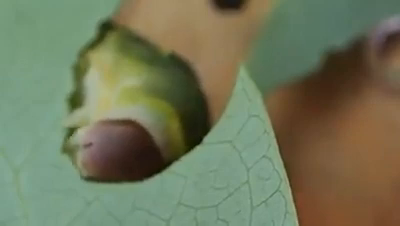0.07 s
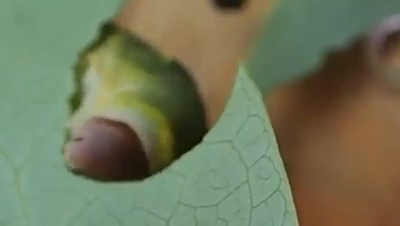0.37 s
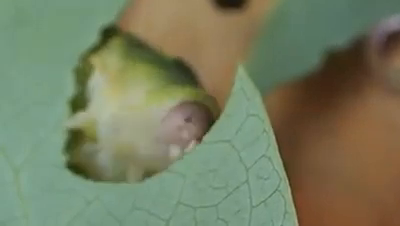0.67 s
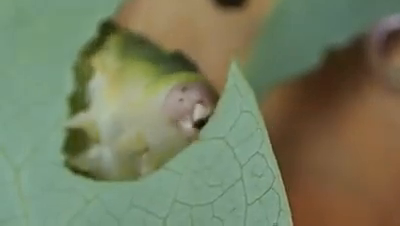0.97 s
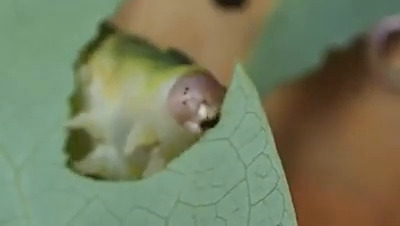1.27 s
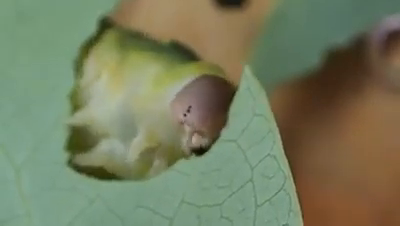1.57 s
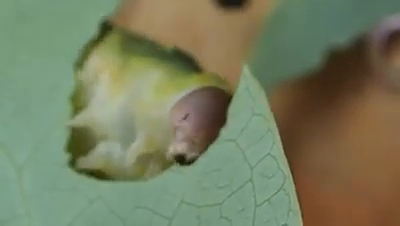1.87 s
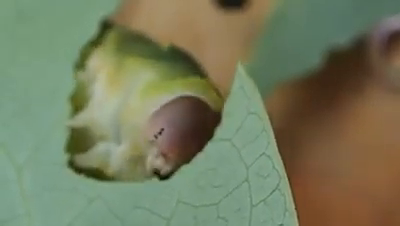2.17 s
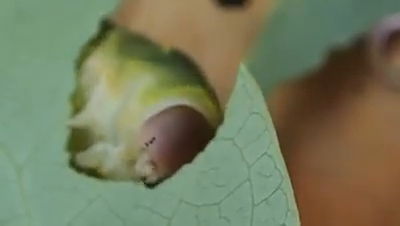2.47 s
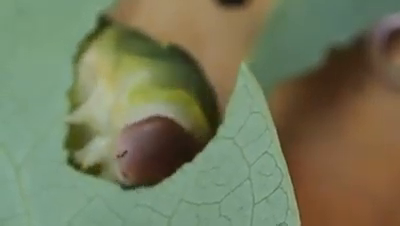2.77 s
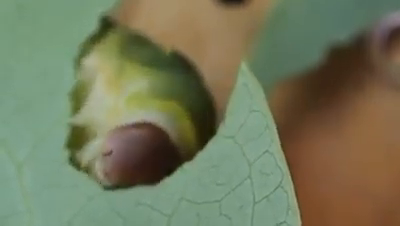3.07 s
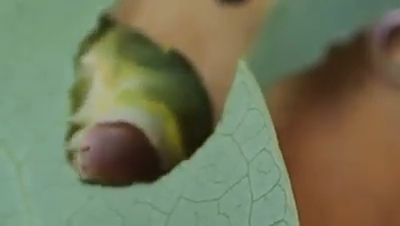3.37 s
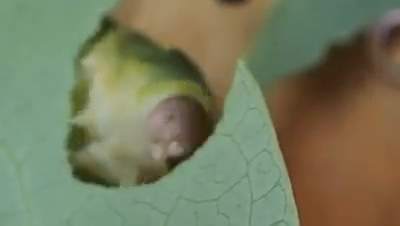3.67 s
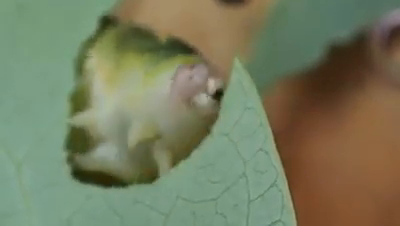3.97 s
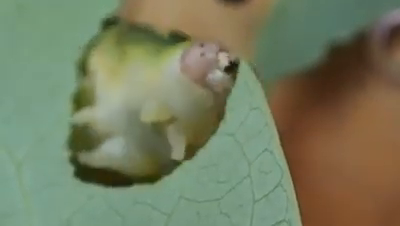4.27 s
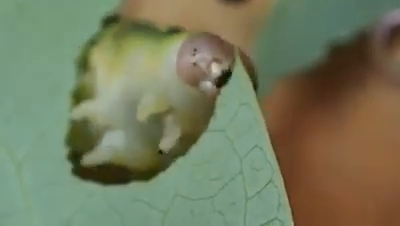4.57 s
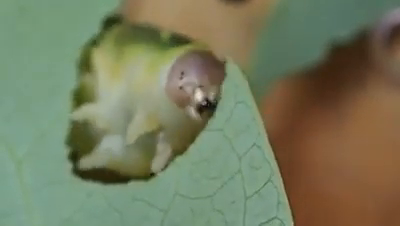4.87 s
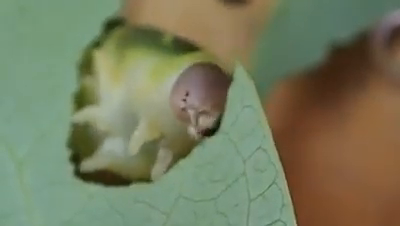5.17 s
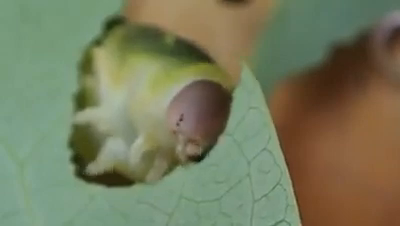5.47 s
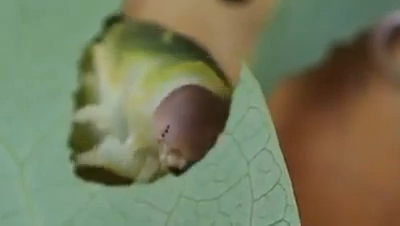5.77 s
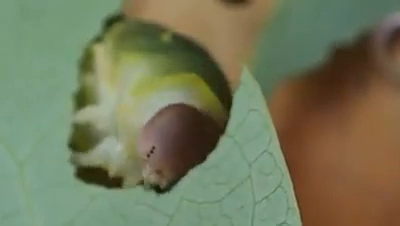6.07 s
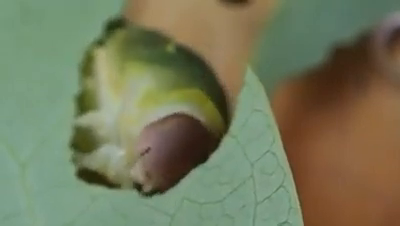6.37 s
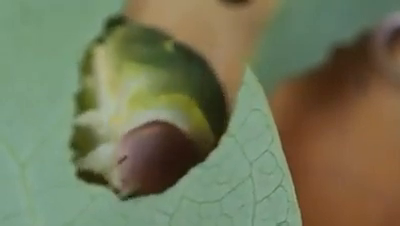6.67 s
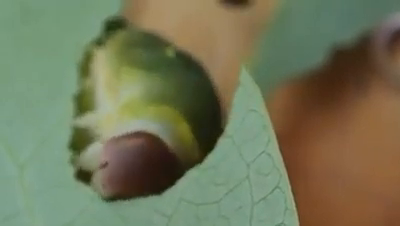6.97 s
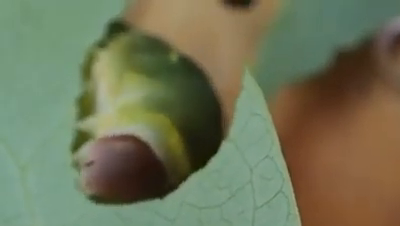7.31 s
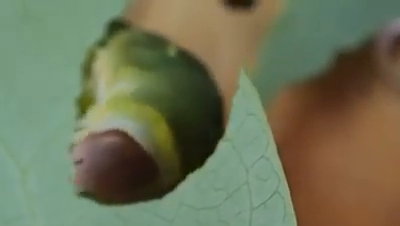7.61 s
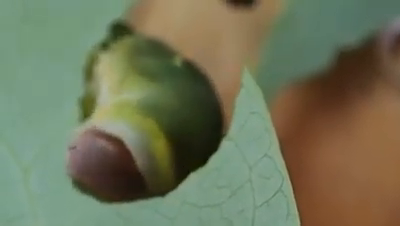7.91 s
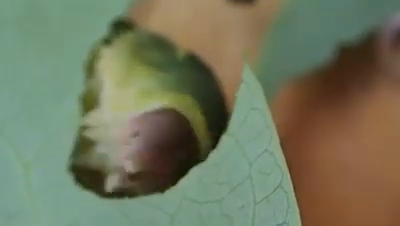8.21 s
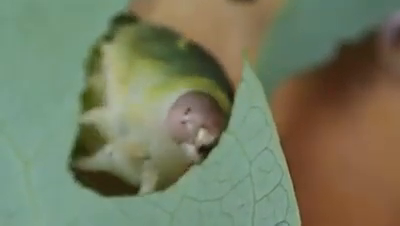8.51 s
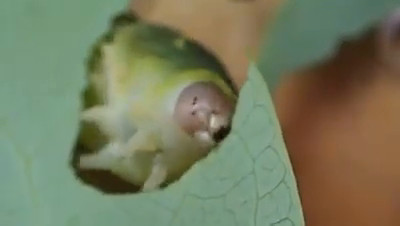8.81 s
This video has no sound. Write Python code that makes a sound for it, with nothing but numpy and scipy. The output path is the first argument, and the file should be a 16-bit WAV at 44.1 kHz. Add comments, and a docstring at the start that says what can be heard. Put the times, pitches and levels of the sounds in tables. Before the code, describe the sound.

A caterpillar chews a leaf close by in bouts of quick, crisp crunching ticks, over a soft hiss and low hum.

```python
"""Caterpillar chewing a leaf

Close by, the head sweeps along the edge from tip to foot at six bites a second. Each bite fractures
a run of tiny cells and now and then snaps a vein; both impulses excite the stiff leaf's damped modes.
Sometimes the jaws skid and squeak by stick-slip friction. Behind this lie a soft hiss, the low drone
of the room, the hum of distant machines and one dull knock."""
import sys
import numpy as np
from scipy import signal
from scipy.fft import rfft, irfft, next_fast_len
from scipy.io import wavfile
from scipy.ndimage import map_coordinates

SR = 44100
rng = np.random.default_rng(int(sys.argv[2]) if len(sys.argv) > 2 else 0)


def master(y):
    """Save y as 16-bit WAV."""
    cut = np.clip(np.atleast_2d(y).T, -1, 1)
    pcm = np.round(cut * 32767)  # scale
    wavfile.write(sys.argv[1], SR, pcm.astype(np.int16))


N = 399105


def amp(db):
    """Amplitude ratio of a level in decibels."""
    return 10 ** (np.asarray(db) / 20)


def unit(x):
    """Normalisation to an rms of 1."""
    return x / np.sqrt(np.mean(x ** 2) + 1e-20)


def wobble(n, rate):
    """Smooth random modulation: n samples of a spline with `rate` knots a second."""
    return map_coordinates(rng.standard_normal(int(n * rate / SR) + 4), [np.arange(n) * rate / SR])


def filtered(x, response):
    """Linear filtering: the spectrum of x times a complex frequency response."""
    n = x.shape[-1]
    padded = next_fast_len(n + 8192)
    return irfft(rfft(x, padded) * response(np.fft.rfftfreq(padded, 1 / SR)), padded)[..., :n]


def coloured(x, points):
    """Spectral shaping by (f/Hz, level/dB) points on a logarithmic frequency axis."""
    f, db = np.transpose(points)
    return filtered(x, lambda hz: amp(np.interp(np.log(hz + 1), np.log(f), db)))


def resonance(f, centre, width):
    """Causal frequency response of a damped harmonic oscillator."""
    return 1j * f * width / (centre ** 2 - f ** 2 + 1j * f * width)


def band(x, hz, width, order=2):
    """Band-pass filtering by equal resonators in cascade; rms 1."""
    return unit(filtered(x, lambda f: resonance(f, hz, width) ** order))


def fractures(n, rate, spread_db):
    """Shot noise: cells burst at random, `rate` a second, with uneven sizes; rms 1."""
    hit = rng.random(n) < rate / SR
    polarity = rng.choice([-1, 1], n)
    size = amp(spread_db * np.clip(rng.standard_normal(n), -2, 2))
    return unit(hit * polarity * size)


# Spectrum of the room's low sound: f/Hz, relative level/dB
ROOM_SPECTRUM = [(15, -16), (30, -8), (45, -11), (62, 1.5), (80, 1), (100, -2.5), (135, 1.5), (170, -3),
                 (215, 3), (320, -8.5), (400, 0.5), (500, -7), (800, -11.5), (1500, -17), (2200, -24.5),
                 (4000, -33.5)]
# Noise bands of distant machines: f/Hz, bandwidth/Hz, relative level/dB
MACHINE_BANDS = [(207, 7, -53), (237.5, 3.5, -49.6), (247.5, 5.5, -49.4), (289.5, 7.4, -59),
                 (353.5, 1.6, -60.5), (392.8, 12, -64.5), (415, 4, -65), (449.3, 16, -62), (531, 2.4, -62)]
# Spectrum of the hiss: f/Hz, relative level/dB
HISS_SPECTRUM = [(20, -15), (60, -11.5), (150, 6.5), (240, -1.5), (500, 7), (1300, 8.5), (2100, 3.5),
                 (2700, 2), (3600, -18), (4300, -1), (5000, 4), (5600, 7.5), (6400, -21.5), (7400, 1),
                 (8600, -11)]

def background(room_db=-44.3, hiss_db=-53.2, rumble_db=-53.5, fall_db_per_s=.3748):
    """Coherent and diffuse noise: room, machines and rumble are alike in both channels; hiss is not."""
    t = np.arange(N) / SR
    room = amp(room_db) * unit(coloured(rng.standard_normal(N), ROOM_SPECTRUM))
    machines = sum(amp(db) * band(rng.standard_normal(N), hz, 2 * width, order=3)
                   for hz, width, db in MACHINE_BANDS)
    hiss = amp(hiss_db) * unit(coloured(rng.standard_normal((2, N)), HISS_SPECTRUM))
    rumble = amp(rumble_db) * band(rng.standard_normal(N), hz=90, width=120)
    passing = np.exp(-.5 * ((t - 3.3) / 1.4) ** 2)  # the rumble peaks at 3.3 s
    fading = amp(.82 - fall_db_per_s * t)
    return fading * (room + machines) + passing * rumble + hiss


# Spectrum of the room's lateral sound: f/Hz, relative level/dB
LATERAL_SPECTRUM = [(20, -26), (40, -9), (60, 0), (150, 2), (350, 1.5), (900, -7), (2500, -25)]

def lateral_room(db=-61):
    """Antiphase: room sound from the sides reaches left and right with opposite signs."""
    side = amp(db) * unit(coloured(rng.standard_normal(N), LATERAL_SPECTRUM))
    return np.array([side, -side])


# Passing low tones: peak t/s, standard deviation/s, f/Hz, range of wander/Hz, peak level/dB
DRONE_SWELLS = [(.2, .25, 207, 12, -50), (.98, .07, 243, 8, -45), (1.72, .1, 240, 8, -43),
                (1.8, .2, 210, 8, -49), (2.1, .2, 54, 8, -56), (3.5, .4, 64.5, 10, -53),
                (6.82, .07, 243, 8, -44.5), (8.4, .25, 74, 8, -55)]

def swelling():
    """Amplitude modulation: unsteady tones rise from the drone and sink under Gaussian envelopes."""
    t, out = np.arange(N) / SR, np.zeros(N)
    for peak, spread, hz, wander, db in DRONE_SWELLS:
        pitch = hz + wander / 4 * wobble(N, 8)
        envelope = amp(db) * np.exp(-.5 * ((t - peak) / spread) ** 2)
        out += np.sqrt(2) * envelope * np.sin(2 * np.pi * np.cumsum(pitch) / SR)
    return out


# Runs of a distant motor: t/s, duration/s, initial f/Hz, initial level/dB
MOTOR_RUNS = [(3.88, 1.206, 422, -46.6), (5.3, .17, 417, -50)]

def motor_whine(sag_hz_per_s=4, fade_db_per_s=2.4, waver_db=.6, ramp_s=.055):
    """Tonal machine noise: one spectral line sags in frequency as it wavers and fades."""
    out = np.zeros(N)
    for start, length, first_hz, db in MOTOR_RUNS:
        t = np.maximum(np.arange(N) / SR - start, 0)
        running = np.clip(np.minimum(t, length + ramp_s - t) / ramp_s, 0, 1)
        hz = first_hz - sag_hz_per_s * t
        level = amp(db - fade_db_per_s * t + waver_db * wobble(N, 9))
        out += np.sqrt(2) * running * level * np.sin(2 * np.pi * np.cumsum(hz) / SR)
    return out


def knock(at_s=7.769, hz=500, db=-25, t60=.028, attack_s=.002):
    """Free decay of one damped mode: a soft, dull knock."""
    t = np.maximum(np.arange(N) / SR - at_s, 0)
    envelope = amp(db - 60 * t / t60) * (1 - np.exp(-t / attack_s))
    return envelope * np.sin(2 * np.pi * hz * t)


# Spectrum of the leaf damped by feet and lips: f/Hz, relative level/dB
DAMPED_LEAF = [(1200, -36.5), (2100, -16), (2800, -5.5), (3700, -14), (4250, -12), (4550, 2), (5000, -3.5),
               (5700, -5), (6500, -10.5), (7000, -15), (8600, -15.5)]
# Course of the faint crackle: t/s, level/dB
FIDGET_LEVELS = [(0, -47.5), (.37, -60), (1.1, -60), (1.55, -51.5), (4.2, -53), (5.2, -51.5), (8, -52.5),
                 (8.2, -60.5), (9.05, -58)]

def fidgeting(restless_db=1.2):
    """Contact damping: faint scratches of jaws and feet sound in broad humps between the bites."""
    scratches = coloured(fractures(N, rate=2500, spread_db=2), DAMPED_LEAF)
    db = np.interp(np.arange(N) / SR, *np.transpose(FIDGET_LEVELS))
    return amp(db + restless_db * wobble(N, 22)) * unit(scratches)


# Light drags of jaws and feet: t/s, duration/s, initial f/Hz, final f/Hz, level/dB
DRAGS = [(7.28, .06, 5300, 5000, -51), (7.99, .12, 4100, 2950, -58), (8.11, .06, 5200, 5700, -57)]

def scraping(width_hz=700):
    """Sliding friction: grains sound through four crossfaded bands, heard as one gliding resonance."""
    out, n = np.zeros(N + SR), SR // 5
    for start, length, first_hz, last_hz, db in DRAGS:
        progress = np.clip(np.arange(n) / SR / length, 0, 1)
        envelope = amp(db) * np.sqrt(np.abs(np.sin(np.pi * progress)))
        grains = fractures(n, rate=1500, spread_db=3)
        for stage in np.linspace(0, 1, 4):
            hz = first_hz + stage * (last_hz - first_hz)
            share = np.maximum(1 - 3 * np.abs(progress - stage), 0)
            out[int(start * SR):][:n] += envelope * share * band(grains, hz, width_hz)
    return out[:N]


# Skids of the jaws on the cut edge: t/s, duration/s, initial f/Hz, final f/Hz, level/dB
SKIDS = [(2.808, .032, 4700, 5350, -42), (3.39, .028, 4950, 5600, -39), (3.422, .013, 4950, 4900, -39),
         (4.31, .038, 4950, 5650, -42), (4.34, .03, 4550, 4900, -42.5), (4.841, .01, 4850, 4830, -33),
         (4.855, .022, 5150, 4980, -37), (4.878, .032, 5200, 5600, -38), (6.83, .064, 5700, 5330, -35)]

def squeaking(wander=.014, slips_per_s=260, flutter_db=3.5, ramp_s=.004):
    """Stick-slip oscillation: a short, fluttering whistle glides as the jaws skid."""
    out = np.zeros(N + SR)
    for start, length, first_hz, last_hz, db in SKIDS:
        t = np.arange(int(length * SR)) / SR
        glide = np.interp(t, [0, length], [first_hz, last_hz])
        hz = glide * (1 + wander * wobble(SR // 5, slips_per_s)[:len(t)])
        flutter = amp(flutter_db * wobble(SR // 5, slips_per_s)[:len(t)])
        whistle = unit(flutter * np.sin(2 * np.pi * np.cumsum(hz) / SR))
        pressure = np.clip(np.minimum(t, length - t) / ramp_s, 0, 1)
        out[int(start * SR):][:len(t)] += amp(db) * pressure * whistle
    return out[:N]


# Bending modes of the blade: f/Hz, bandwidth/Hz, relative level/dB
BENDING_MODES = [(1900, 1000, -37.5), (2418, 84, -11.5), (2691, 83, -7.5), (2835, 83, -6.5),
                 (3180, 260, -11), (3316, 74, -9.5), (3580, 110, -8), (3950, 700, -11.5)]
# Modes of the stiff cut edge: f/Hz, bandwidth/Hz, relative level/dB
EDGE_MODES = [(4560, 130, 2.5), (4917, 143, 4), (5210, 88, -1), (5290, 110, 3), (5580, 370, 1.5),
              (5885, 90, 2), (6200, 160, -4), (6110, 96, -0.5), (6400, 84, -1), (6624, 140, -1),
              (6900, 400, -9), (7390, 300, -12), (7970, 300, -15), (8500, 190, -17)]

def leaf(force, flex_db, vary_db, retune=.04, size=2048):
    """Modal response: a force rings the leaf, and every grip retunes and reweights its modes."""
    hz, width, db = np.transpose(BENDING_MODES + EDGE_MODES)
    bends = np.arange(len(hz)) < len(BENDING_MODES)
    shift = retune * np.where(bends, 1, .5)  # the stiff edge moves half as much
    hz = hz * (1 + shift * rng.uniform(-1, 1, len(hz)))
    db = db + flex_db * bends + vary_db * rng.uniform(-1, 1, len(hz))
    f = np.fft.rfftfreq(size, 1 / SR)[:, None]
    gain = np.linalg.norm(amp(db) * np.abs(resonance(f, hz, width)) ** 2, axis=1)
    # minimum phase: the ring starts at once, then the modes beat and die
    cepstrum = irfft(np.log(gain + 1e-4))
    cepstrum[1:size // 2] *= 2
    cepstrum[size // 2 + 1:] = 0
    impulse_response = irfft(np.exp(rfft(cepstrum)))
    return signal.fftconvolve(force, impulse_response)[:len(force)]


# Breaking veins and fibres: t/s, level/dB (first 5 ms), T60/s, bending gain/dB, favoured f/Hz
VEIN_SNAPS = [(0.0413, -27.0, 0.015, 2, 5720.0), (0.3492, -32.5, 0.017, 6, 5790.0),
              (1.0922, -39.0, 0.014, 0, 4830.0), (1.1507, -34.5, 0.02, -1, 5250.0),
              (1.271, -37.5, 0.03, 1, 5170.0), (1.3274, -29.5, 0.02, 0, 5530.0),
              (1.353, -30.0, 0.02, 3, 5200.0), (1.4955, -34.5, 0.014, 5, 5560.0),
              (1.527, -24.5, 0.018, 6, 5470.0), (1.7347, -35.0, 0.018, 6, 5550.0),
              (2.0343, -33.0, 0.018, 3, 5510.0), (2.053, -36.5, 0.018, 12, 5290.0),
              (2.4971, -41.0, 0.014, 5, 5980.0), (2.8047, -37.0, 0.023, 5, 5110.0),
              (2.9855, -26.5, 0.017, 3, 5740.0), (3.0003, -24.5, 0.04, 0, 5500.0),
              (3.1339, -36.5, 0.014, 1, 5540.0), (4.392, -24.5, 0.016, -6, 5230.0),
              (4.401, -37.0, 0.025, 0, 5320.0), (4.5583, -30.5, 0.025, 3, 5510.0),
              (4.571, -33.0, 0.045, -8, 4830.0), (4.7211, -30.0, 0.04, -6, 5010.0),
              (4.7305, -26.0, 0.016, -5, 5080.0), (4.808, -40.5, 0.025, 2, 5310.0),
              (4.8434, -36.5, 0.02, -8, 4920.0), (4.8951, -36.5, 0.03, 1, 5560.0),
              (5.0708, -30.0, 0.04, 3, 5690.0), (5.075, -30.5, 0.025, 2, 5650),
              (5.082, -28.5, 0.012, 4, 5620.0), (5.5508, -34.0, 0.013, 6, 5650.0),
              (5.598, -34.5, 0.018, 7, 5660.0), (5.9186, -35.0, 0.012, 13, 5520.0),
              (6.0673, -37.0, 0.014, 3, 5570.0), (6.408, -38.5, 0.012, 6, 5680.0),
              (6.5723, -39.5, 0.013, 2, 5590.0), (6.832, -36.0, 0.016, 3, 5750.0),
              (6.852, -32.5, 0.02, 3, 5540.0), (6.881, -41.0, 0.012, 3, 5520.0),
              (6.9093, -36.5, 0.01, 11, 5900.0), (7.024, -41.0, 0.015, 8, 6060.0),
              (7.038, -38.5, 0.02, -3, 5050.0), (7.058, -21.0, 0.011, -2, 5650.0),
              (7.069, -35.5, 0.016, -2, 5900.0), (7.2709, -40.0, 0.014, 0, 5360.0),
              (7.4258, -36.0, 0.03, -2, 5140.0), (7.4816, -27.5, 0.013, -3, 5490.0),
              (7.6049, -37.5, 0.025, 2, 5450.0), (7.6498, -39.0, 0.014, 2, 5230.0),
              (7.8158, -32.5, 0.014, -1, 5660.0), (7.8357, -26.5, 0.027, -7, 5460.0),
              (7.843, -28.5, 0.035, -13, 5030.0), (8.6677, -41.5, 0.014, 0, 5240.0),
              (8.8357, -39.0, 0.04, 2, 5160.0), (8.98, -41.0, 0.02, 1, 5060.0)]

def snapping(run_on=.18, lead_in_s=.007, focus_width_hz=550, body_db=-14.5, tick_db=-15):
    """Brittle fracture: a vein gives way in three quick steps, and the tear runs on briefly."""
    before = SR // 100
    out, t = np.zeros(N + SR), (np.arange(SR // 10) - before) / SR
    for start, db, t60, bend_db, hz in VEIN_SNAPS:
        fade = amp(-60 * np.maximum(t / t60, -t / lead_in_s))  # swells in over a few milliseconds
        force = run_on * fractures(len(t), rate=3500, spread_db=3) * fade
        force[before] += 1
        force[before + int(rng.uniform(.001, .0018) * SR)] += .95
        force[before + int(rng.uniform(.0025, .0038) * SR)] += .5
        focused = filtered(force, lambda f: 1 + resonance(f, hz, focus_width_hz))
        ring = unit(leaf(focused, bend_db, vary_db=3))
        body = band(force, hz=3250, width=1600)  # the thick vein itself sounds lower
        tick = band(force, hz=7400, width=2400)  # the break is bright and dry
        crack = ring + amp(body_db + bend_db) * body + amp(tick_db) * tick
        crack /= np.std(crack[before:][:SR // 200])
        out[int(start * SR) - before:][:len(t)] += amp(db) * crack
    return out[:N]


# Path of the head along the edge: t/s, position (0 at the tip, 1 at the foot)
HEAD_PATH = [(0, 0.75), (.4, 0.78), (1.1, 0.13), (3.45, 0.89), (4.3, 0), (5.0, .1), (5.4, 0.32), (7.9, 1),
             (8.45, 0.19), (9.05, 0.28)]
# Compliance along the edge: position, bending gain/dB
EDGE_COMPLIANCE = [(0, -6), (.15, -1.8), (.32, 7.8), (.6, 4.8), (.8, -1), (1, -3.5)]

def flex_at(time_s):
    """Driving-point compliance: bending gain in dB at the head, greatest partway along the edge."""
    position = np.interp(time_s, *np.transpose(HEAD_PATH))
    return np.interp(position, *np.transpose(EDGE_COMPLIANCE))


def stroke(t, length, flex_db, give_s_per_db=.0009, rustle_db=-12, rustle_t60=.24):
    """Elastic give: a bite's envelope rises and falls more slowly where the blade bends freely."""
    give = give_s_per_db * max(flex_db, 0)
    attack, release = .004 + 2 * give, .008 + give
    closing = np.clip(np.minimum(t / attack, (length + release - t) / (2 * release)), 0, 1)
    # the torn edge rustles on after the bite
    rustle = (t > length) * amp(rustle_db - 60 * np.abs(t - length) / rustle_t60)
    return np.maximum(closing, rustle)


# Bites: t/s, duration/s, relative level/dB, favoured edge f/Hz, favoured bending f/Hz
JAW_STROKES = [(0, 0.025, -40.0, 4900, 2650.0), (0.126, 0.088, -40.0, 5090, 2670.0),
               (0.28, 0.096, -39.5, 5180, 3900.0), (1.086, 0.086, -39.5, 5030, 2760.0),
               (1.27, 0.1, -41.5, 5120, 2780.0), (1.454, 0.06, -40.0, 5540, 3450.0),
               (1.665, 0.076, -42.0, 5510, 2710.0), (1.831, 0.075, -42.5, 5080, 2800.0),
               (2.0, 0.07, -41.5, 5230, 3530.0), (2.14, 0.08, -44.0, 5230, 2780.0),
               (2.304, 0.075, -43.5, 5610, 2780.0), (2.471, 0.07, -44.0, 5710, 2780.0),
               (2.637, 0.072, -38.0, 5570, 2760.0), (2.802, 0.076, -39.0, 5310, 2820.0),
               (2.95, 0.081, -40.5, 5500, 2820.0), (3.116, 0.064, -40.5, 5470, 3210.0),
               (3.244, 0.064, -37.5, 5480, 2670.0), (3.372, 0.102, -42.5, 5020, 2820.0),
               (4.31, 0.1, -45.0, 5030, 3190.0), (4.504, 0.042, -39.5, 5040, 3290.0),
               (4.673, 0.041, -35.5, 5250, 2780.0), (4.843, 0.068, -41.0, 5220, 2760.0),
               (5.015, 0.085, -41.0, 5490, 3570.0), (5.181, 0.08, -41.5, 5300, 2840.0),
               (5.337, 0.083, -41.5, 5130, 3210.0), (5.545, 0.08, -43.5, 5650, 3600.0),
               (5.712, 0.068, -43.5, 5360, 2780.0), (5.86, 0.07, -44.5, 5480, 2780.0),
               (6.025, 0.064, -41.5, 5370, 3360.0), (6.184, 0.074, -44.0, 5370, 2800.0),
               (6.347, 0.072, -40.0, 5470, 2780.0), (6.485, 0.064, -40.5, 5020, 2800.0),
               (6.633, 0.067, -40.0, 5090, 2820.0), (6.792, 0.095, -38.5, 5530, 3620.0),
               (7.0, 0.075, -44.0, 5070, 3290.0), (7.208, 0.072, -39.5, 5490, 2690.0),
               (7.426, 0.07, -42.5, 5260, 3900.0), (7.603, 0.066, -37.5, 5410, 2760.0),
               (7.766, 0.074, -40.5, 5350, 2780.0), (7.94, 0.06, -41.0, 5150, 2730.0),
               (8.45, 0.06, -52.0, 4740, 2670.0), (8.644, 0.082, -44.5, 5110, 2760.0),
               (8.835, 0.077, -45.0, 5190, 2800.0), (9.015, 0.07, -41.0, 5040, 2760.0)]

def tearing(gain_db=-.36, ragged_db=.8, crackle_db=-11, vein_lag_s=.02):
    """Impulsive excitation: in each bite a dense run of bursting cells and a few larger ring the leaf."""
    out, t = np.zeros(N + SR), np.arange(SR // 5) / SR
    for start, length, db, edge_hz, bend_hz in JAW_STROKES:
        flex_db = flex_at(start)
        roughness_db = ragged_db * np.clip(wobble(len(t), 60), -2, 1)
        effort = amp(db + gain_db + roughness_db) * stroke(t, length, flex_db)
        # jaws that catch on a vein tear in clumps and pick out single modes
        meets_vein = any(start < s < start + length + vein_lag_s for s, *_ in VEIN_SNAPS)
        catch = .69 if meets_vein else .16
        clump_db, vary_db, grip = 1.7 + 2.4 * catch, 3 + 3 * catch, .3 + .9 * catch
        slips = np.clip(wobble(len(t), 220), -2, .9)
        cells = amp(clump_db * slips) * fractures(len(t), rate=1700, spread_db=4)
        cells += amp(crackle_db) * fractures(len(t), rate=120, spread_db=2)
        force = filtered(cells, lambda f: 1 + grip * resonance(f, edge_hz, width=450)
                         + .22 * resonance(f, bend_hz, width=400))
        ring = unit(leaf(force, flex_db, vary_db))
        out[int(start * SR):][:len(t)] += effort * ring / np.std(ring[t < length])
    return out[:N]


# Spectrum of the chewing's stereo spread, strongest near 4.6 kHz: f/Hz, relative level/dB
SPREAD_SPECTRUM = [(1000, -30), (2400, -13), (3600, -13), (4250, -5), (4600, 12), (5150, 8), (5700, 1.5),
                   (6400, -16.5), (7100, -2.5), (7900, -17), (9000, -23)]

def stereo_spread(x, side_db=-8):
    """Decorrelation: noise that follows every burst is added on the left and subtracted on the right."""
    following_noise = unit(coloured(x * rng.standard_normal(N), SPREAD_SPECTRUM))
    side = amp(side_db) * np.std(x) * following_noise
    return np.array([x + side, x - side])


def scene():
    """Superposition: chewing in front, the room behind."""
    chewing = stereo_spread(tearing() + snapping() + squeaking() + scraping() + fidgeting())
    return chewing + background() + swelling() + lateral_room() + motor_whine() + knock()


def record(dry, cutoff_hz=8640):
    """Band limiting: a very steep low-pass removes the highest treble."""
    return filtered(dry, lambda hz: 1 / np.sqrt(1 + (hz / cutoff_hz) ** 300))


dry = scene()
out = record(dry)
master(out)
```